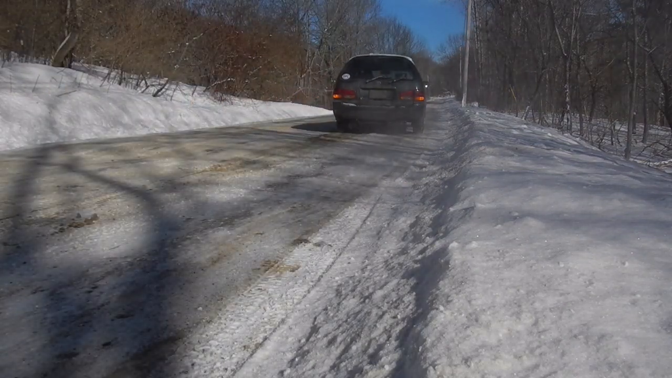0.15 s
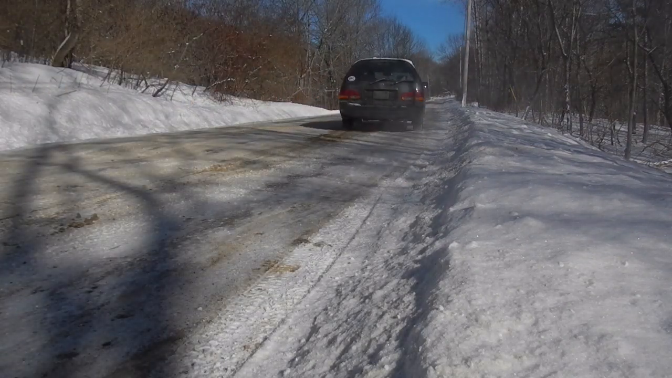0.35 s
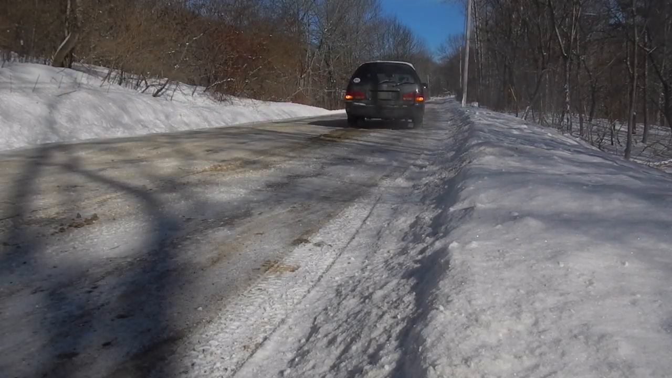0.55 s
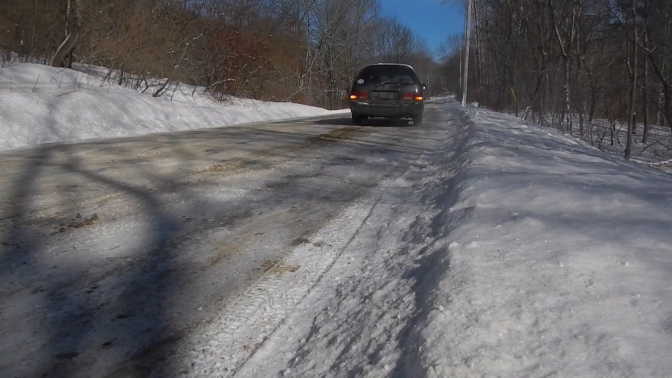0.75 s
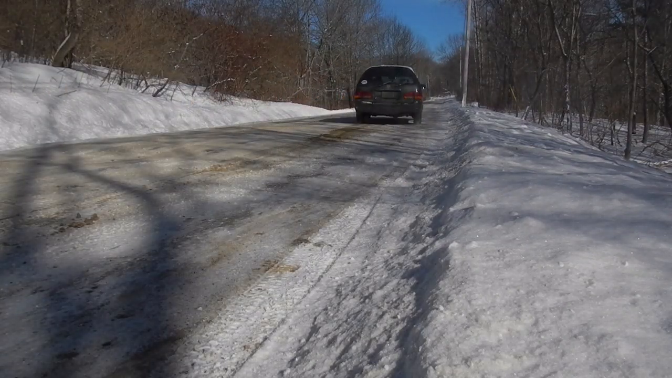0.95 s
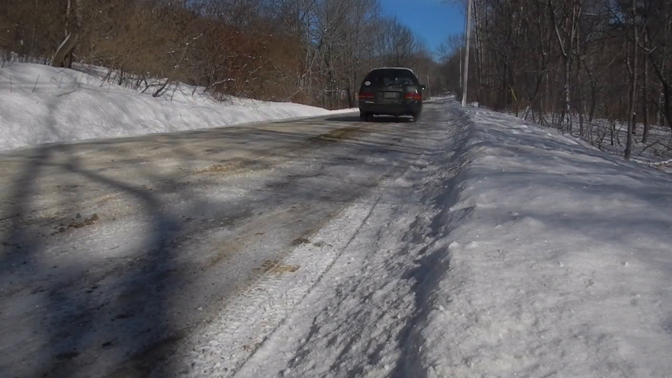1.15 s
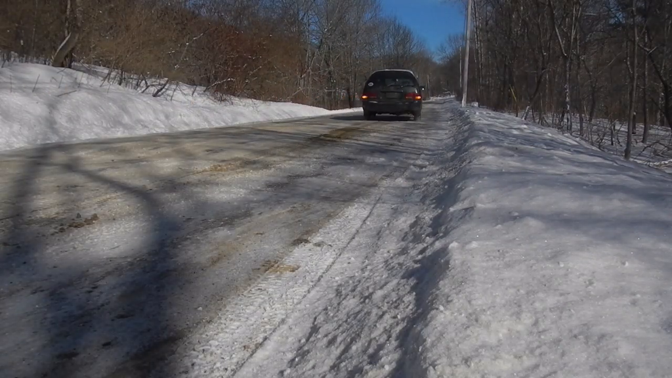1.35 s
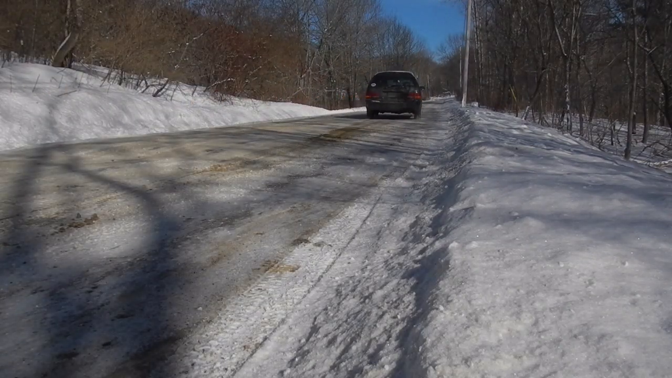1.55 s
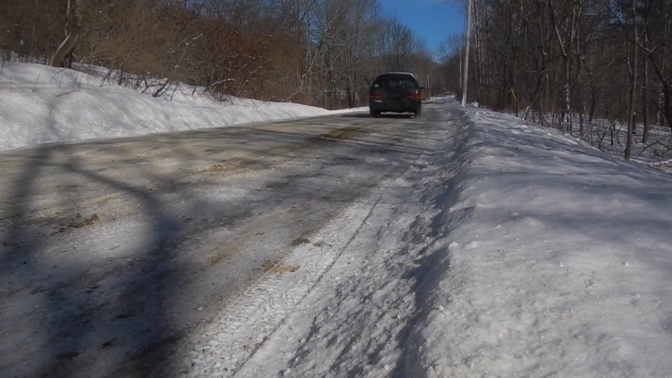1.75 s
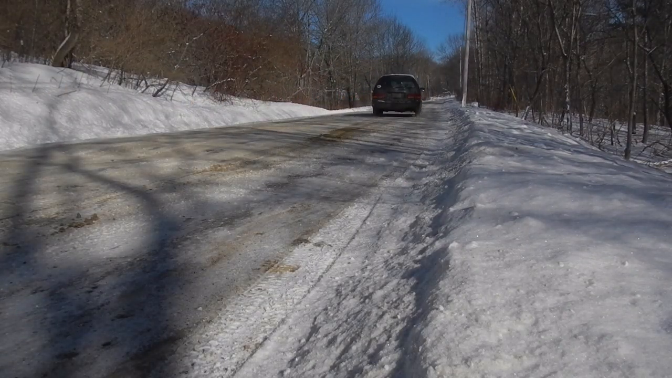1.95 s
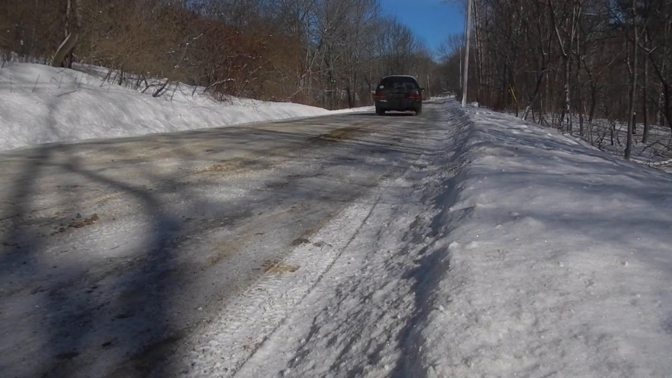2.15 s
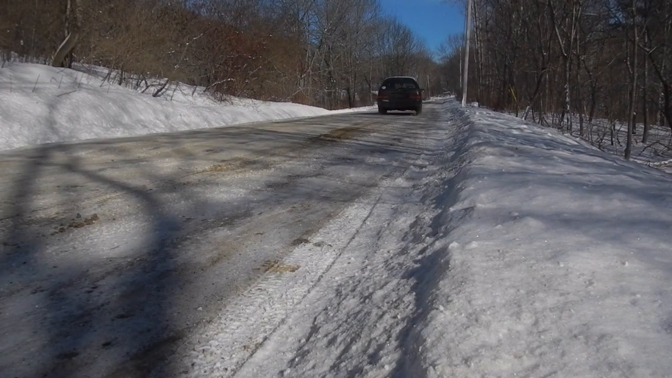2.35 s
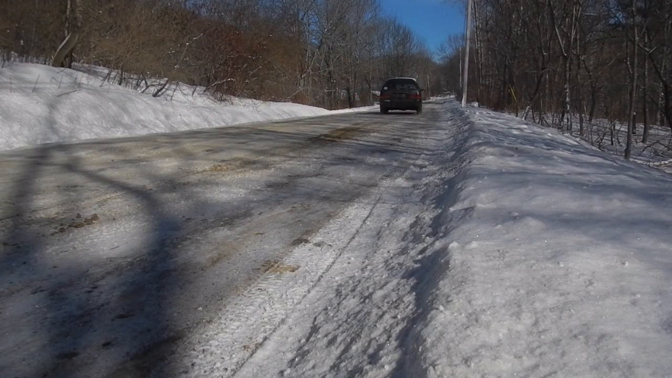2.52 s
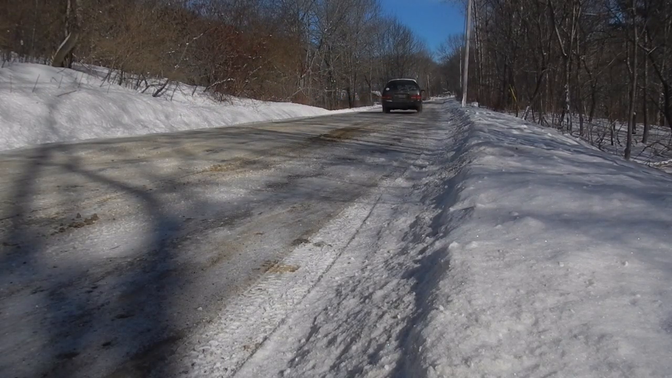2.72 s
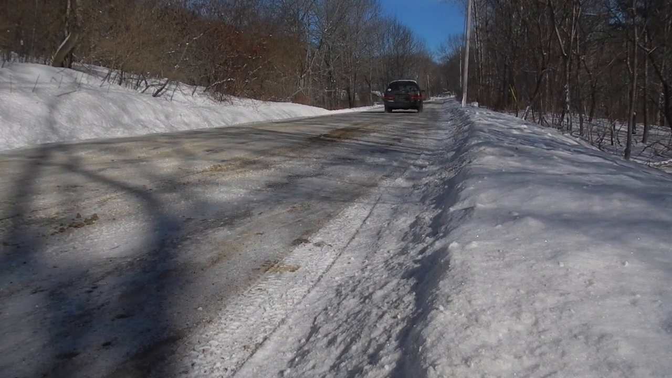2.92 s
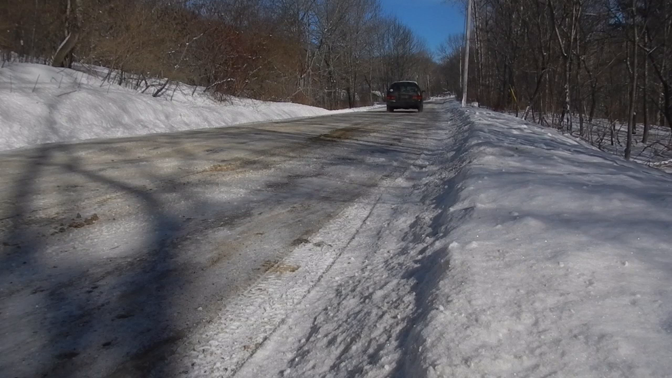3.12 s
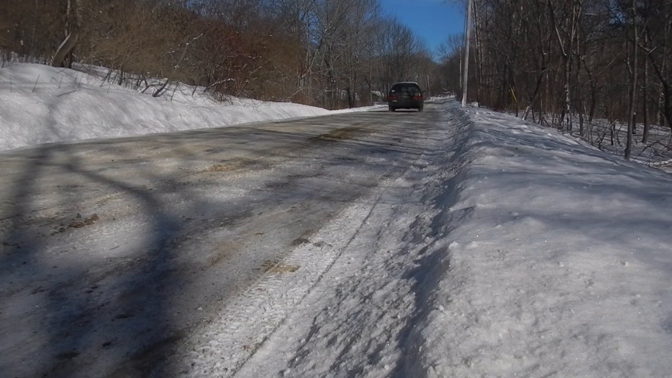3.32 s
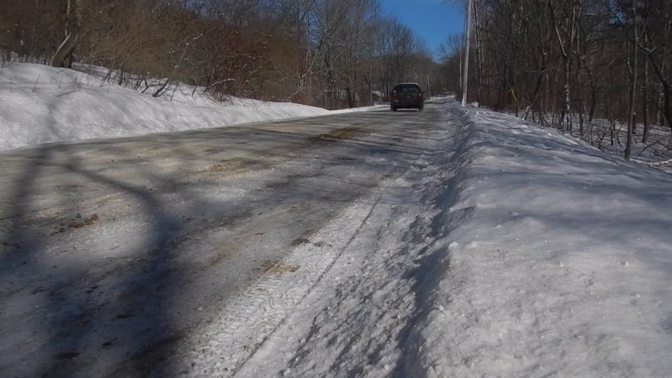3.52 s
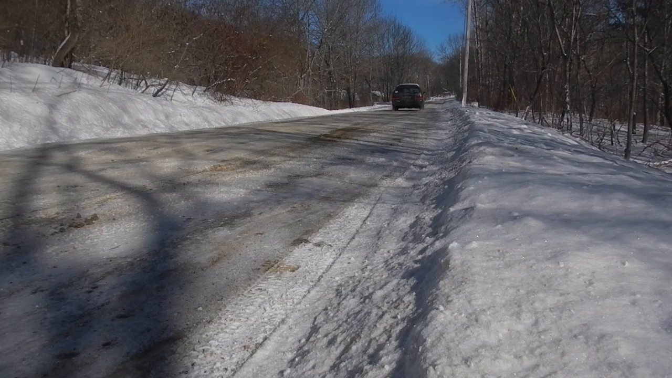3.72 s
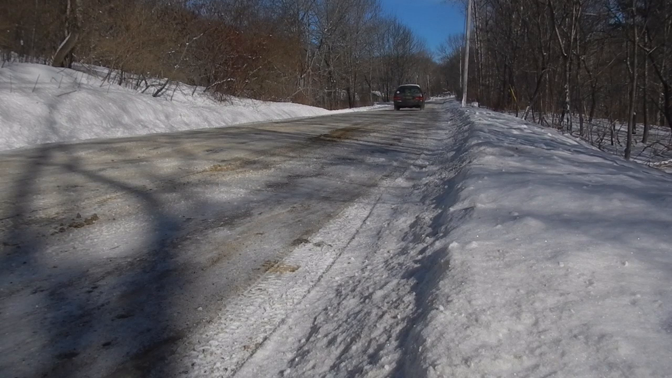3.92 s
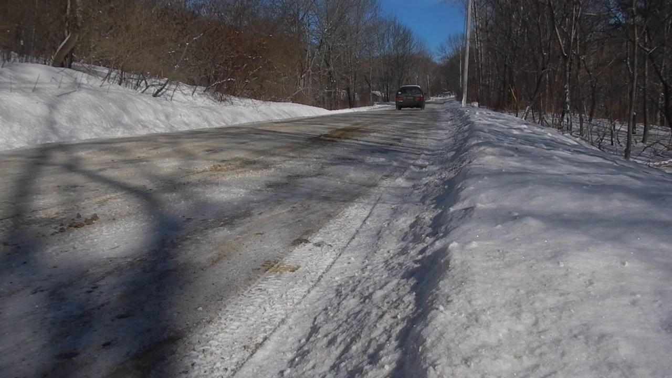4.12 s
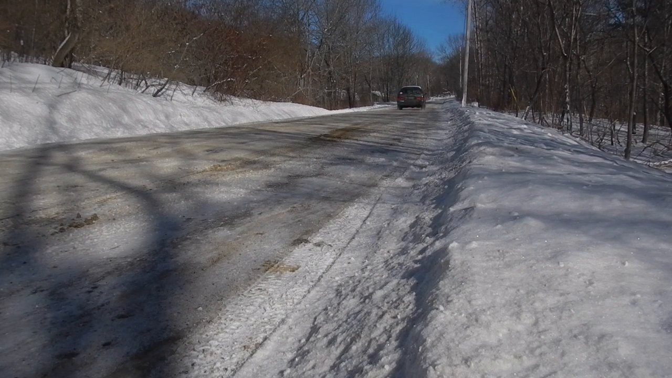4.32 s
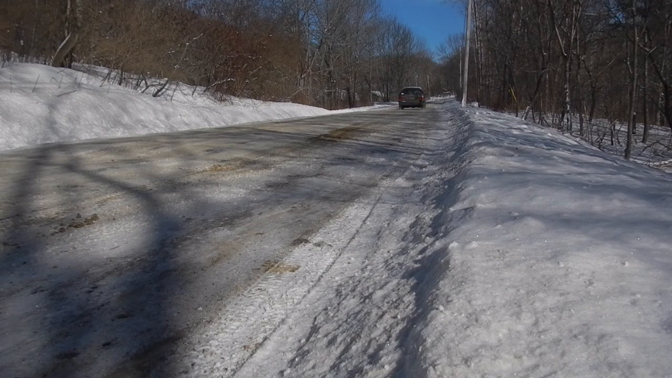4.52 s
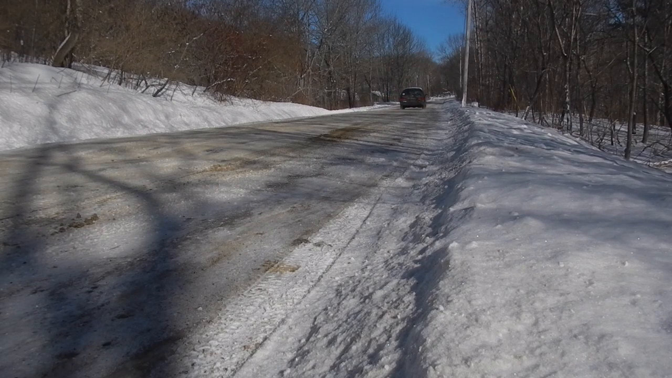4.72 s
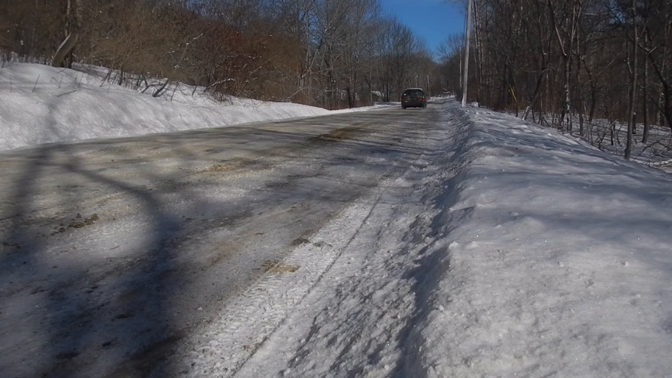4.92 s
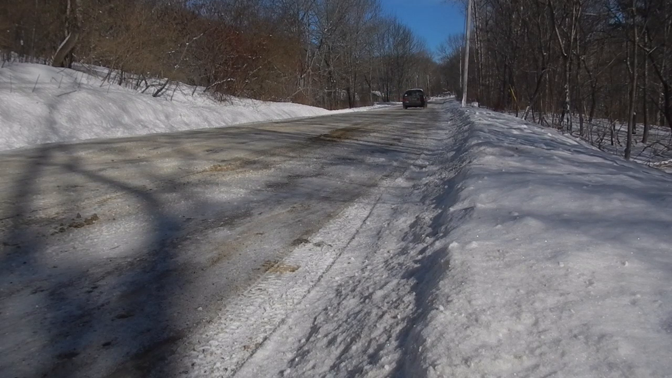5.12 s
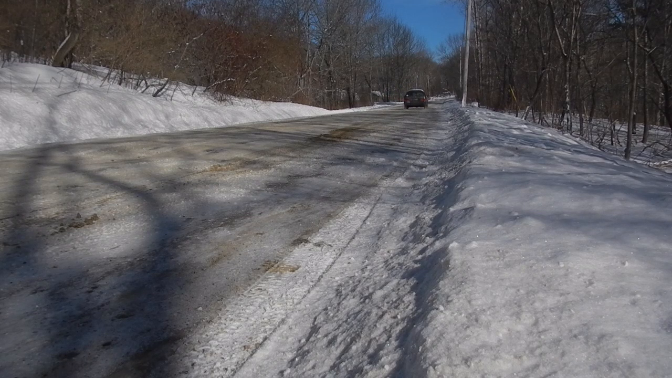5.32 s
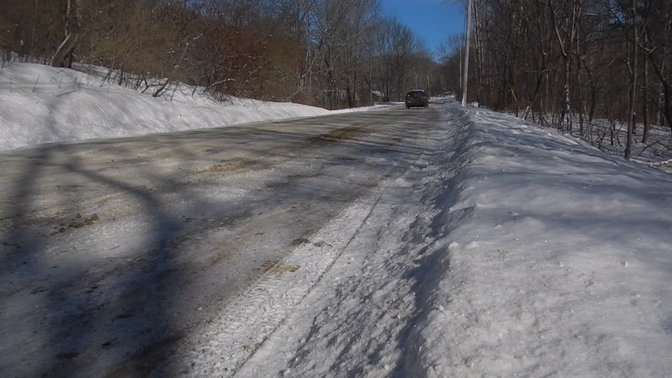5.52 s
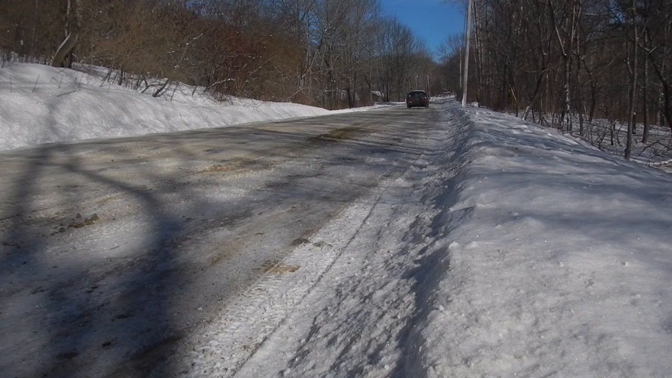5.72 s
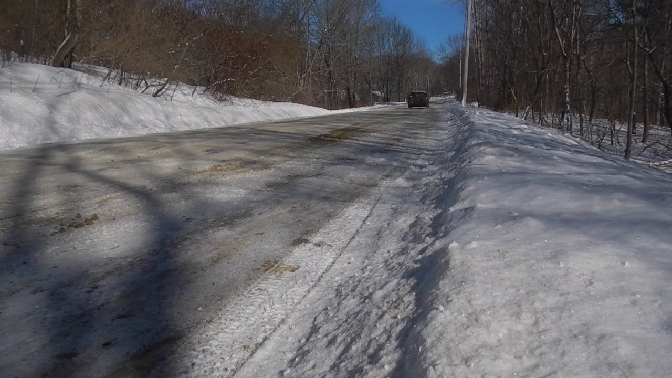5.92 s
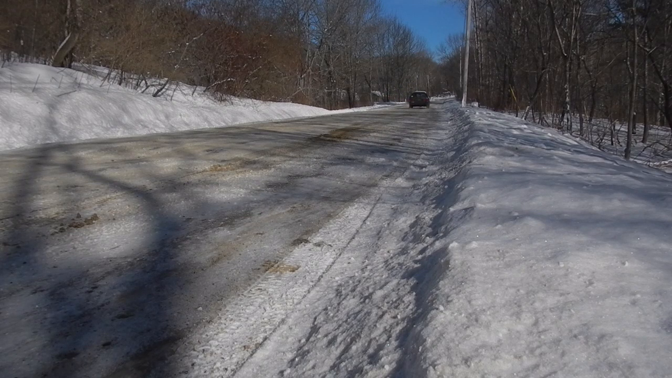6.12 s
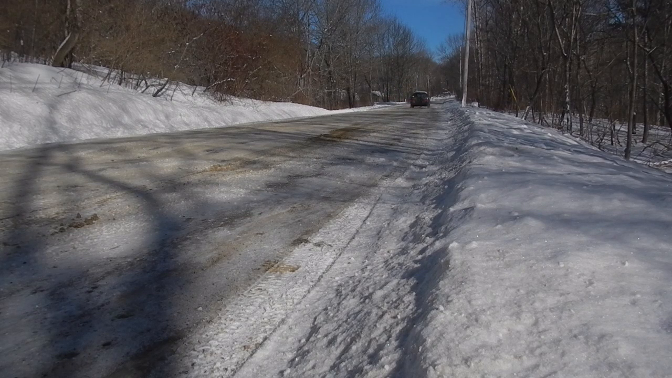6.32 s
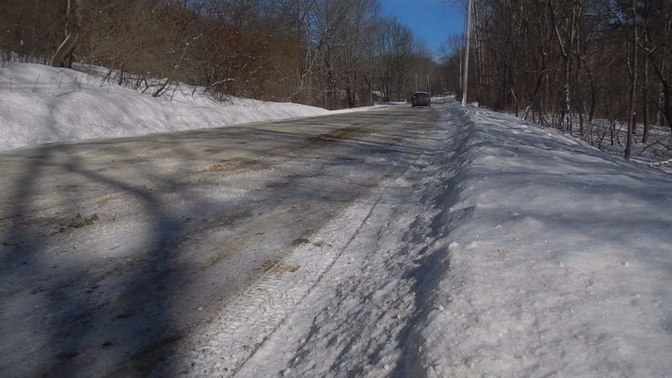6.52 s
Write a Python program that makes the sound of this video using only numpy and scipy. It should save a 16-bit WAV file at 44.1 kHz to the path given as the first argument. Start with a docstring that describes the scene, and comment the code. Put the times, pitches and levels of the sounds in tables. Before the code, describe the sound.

Outdoors on a snowy wooded road, a four-cylinder car is already close and pulling away at 0 s. Its open exhaust gives a deep, resonant drone, about 120 Hz and rising, with a rough, fluttering rasp. Slushy tyre hiss and tread roar surround it, surging around 0.4 and 0.9 s, with small dry grit snaps mostly in the first 0.7 s, then at 1.2 and 2.1 s. The engine climbs until about 1.5 s, eases and slides down through an upshift by 2 s, then climbs slowly again to the end near 6.7 s, steadily quieter and softer. Faint, thin, quavering bird notes around 7 kHz appear between 0.15 and 3.3 s. Tread roar lifts slightly near 4 s. A steady, slightly nasal outdoor hush remains, with stereo microphone hiss and a very faint high whine, mostly left.

```python
"""First heard, close by: the open exhaust of a four-cylinder car pulling away on a snowy road.
It shifts up once and fades into the distance; the pipe drones on crank orders and rasps with each firing.
Tyres hiss and crunch through slush and grit, as shaped noise with short snaps on top.
A small bird calls in thin, quavering tones from the woods, over a steady outdoor hush.
Two microphone ports hear it in stereo; the camera adds its own hiss and a faint high whine."""
import sys
import numpy as np
from scipy import signal
from scipy.fft import rfft, irfft, next_fast_len
from scipy.io import wavfile
from scipy.ndimage import uniform_filter1d, map_coordinates

SR = 44100
rng = np.random.default_rng(int(sys.argv[2]) if len(sys.argv) > 2 else 0)


def dump_mix(stems):
    """Bounce the given channels to the path in sys.argv[1] as a 16-bit WAV at rate SR."""
    frames = np.atleast_2d(stems).T  # one column per channel
    limited = np.clip(frames, -1, 1)  # hard clip at full scale
    pcm = np.round(limited * 32767).astype(np.int16)
    wavfile.write(sys.argv[1], SR, pcm)


N = 293706

# The engine climbs, drops at the upshift and climbs again: (time [s], crank speed [Hz])
CRANK_SPEED = [(0.0, 59.28), (0.15, 61.52), (0.4, 62.93), (0.95, 65.41), (1.5, 68.12), (1.62, 67.7),
               (1.8, 62.66), (1.97, 59.63), (2.3, 59.22), (2.65, 59.81), (3.05, 61.4), (3.5, 62.18),
               (3.75, 63.39), (3.97, 63.09), (4.3, 64.47), (5.3, 66.41), (5.65, 67.41), (6.66, 69.68)]
# Lines from unequal firings: (crank order, level against the mean of orders 1 and 3 [dB])
LOPE_LINES = [(.5, -28), (1.5, -11.5), (1.75, -10), (2.25, -17), (2.5, -22), (2.75, -17), (3.25, -19),
              (3.5, -24), (3.75, -19)]
# Overtones that follow the rasp: (crank order, relative level [dB])
BARK_LINES = [(4.5, -9.5), (4.75, 0.5), (5, 0.5), (6.25, -6), (6.5, -17), (6.75, 0), (7, -1), (8, -1),
              (10, -8.5)]
# Colour of the gas rushing from the pipe: (frequency [Hz], relative density [dB per Hz])
GAS_COLOUR = [(18, -33), (34, 3), (50, -4), (85, 5), (200, 2.5), (300, -12), (335, -17), (410, 0.5),
              (520, -7), (800, -8.2), (1300, -18), (2000, -25), (5000, -66)]
# The throttle eases for the upshift and opens in the new gear: (time [s], half width [s], rasp change [dB])
THROTTLE_MOVES = [(1.82, .22, -1.5), (3.3, 0.67, 1.3)]
# The rasp is stronger when the engine lugs, and softens with revs and with distance.
RASP_DB, LUG_HZ, RASP_DB_PER_HZ, RASP_DB_PER_M = -48, 60.03, 1.32, 0.32


def exhaust():
    """Clean crank orders, the lope of unequal firings, and a puff of gas at every firing."""
    crank_hz, = curves(CRANK_SPEED)
    order_db = order_levels(crank_hz)
    throttle_db = sum(db * swell(s, width_s) for s, width_s, db in THROTTLE_MOVES)
    rasp_db = RASP_DB + throttle_db - RASP_DB_PER_HZ * (crank_hz - LUG_HZ)
    rasp_db = rasp_db - fade(db_per_m=RASP_DB_PER_M)
    angle = 2 * np.pi * np.cumsum(crank_hz) / SR

    # firings leave the pipe alternately early and late, which puts the odd orders a quarter cycle off
    drone = sum(amp(db + 0.54 * wobble(30)) * np.sin(k * angle + k % 2 * np.pi / 2)
                for k, db in order_db.items())

    # the unevenness repeats every four turns of the crank, so its lines fall on quarter orders
    imbalance_db = (order_db[1] + order_db[3]) / 2
    lope = amp(imbalance_db) * sum(wavering_line(k, db, angle) for k, db in LOPE_LINES)
    bark = amp(rasp_db - 0.5) * sum(wavering_line(k, db, angle) for k, db in BARK_LINES)

    # the gas pulses twice a turn, with one of the two pulses stronger
    pulse_db = 4.4 * np.cos(2 * angle) + 2.9 * np.cos(angle)
    flutter_db = 4.2 * np.tanh(wobble(110))
    puffs = amp(pulse_db + flutter_db) * rng.standard_normal((2, N))
    gas = amp(rasp_db + 7.0) * spread(puffs, GAS_COLOUR)
    return np.sqrt(2) * (drone + lope + bark) + gas


def wavering_line(order, db, angle):
    """Combustion varies from cycle to cycle, so a weaker line wavers in size and timing."""
    phase = 0.22 * wobble(15) + rng.uniform(0, 2 * np.pi)
    return amp(db + 1.2 * wobble(5.9)) * np.sin(order * angle + phase)


# Each order swells as it sweeps through a pipe resonance; order 2 is the firing rate:
# (crank order, resonance [Hz], width [Hz], base level at resonance [dB], loss per doubling of distance [dB])
PIPE_RESONANCES = [(1, 51.5, 21.4, -32.5, 5.5), (2, 118.5, 14.1, -16.5, 7.5), (3, 193, 17.7, -24.5, 8),
                   (4, 222, 62, -37, 8), (6, 378.7, 17, -33.5, 7), (9, 573, 25, -56.5, 1)]
# While the car is close the pipe points past the microphone, dulling the orders above the firing rate.
OFF_AXIS_DB_PER_ORDER, OFF_AXIS_S = 1.3, 0.31
# Order 3 comes from uneven firing and weakens as the revs rise above the lugging speed.
UNEVEN_DB_PER_HZ = 0.52
# The pipe cancels a narrow band just under the resonance of order 3.
NOTCH_HZ, NOTCH_WIDTH_HZ, NOTCH_DB = 184.1, 3.3, 7
# The firings even out briefly as the new gear takes hold, which weakens order 3.
SHIFT_S, SHIFT_WIDTH_S, SHIFT_DIP_DB = 2.06, 0.1, 8


def order_levels(crank_hz):
    """Level in dB of each crank order, from its place on the pipe's resonance and the car's distance."""
    off_axis_db = OFF_AXIS_DB_PER_ORDER * swell(0, OFF_AXIS_S)
    levels = {}
    for k, hz, width_hz, db, loss_db in PIPE_RESONANCES:
        detuned_db = 10 * np.log10(1 + (2 * (k * crank_hz - hz) / width_hz) ** 2)
        levels[k] = db - detuned_db - max(k - 2, 0) * off_axis_db - fade(db_per_doubling=loss_db)
    uneven_db = UNEVEN_DB_PER_HZ * (crank_hz - LUG_HZ)
    notch_db = NOTCH_DB * np.exp(-((3 * crank_hz - NOTCH_HZ) / NOTCH_WIDTH_HZ) ** 2)
    levels[3] = levels[3] - uneven_db - notch_db - SHIFT_DIP_DB * swell(SHIFT_S, SHIFT_WIDTH_S)
    return levels


# Colours of tread roar, slush and fine spray: (frequency [Hz], relative density [dB per Hz])
ROAR_COLOUR = [(60, -24), (150, 0), (300, 4.5), (420, 0), (660, -2.5), (830, -0.5), (1100, -7.5),
               (1250, -6), (1700, -9), (2100, -11.5), (2600, -18.5), (6000, -46)]
SLUSH_COLOUR = [(900, -12), (1800, -4), (2500, 1.5), (3200, 1), (3800, -0.5), (4300, -6.5), (4900, -11),
                (5600, -22), (6700, -13.5), (9000, -27), (14000, -36)]
SPRAY_COLOUR = [(2000, -13), (4500, 3), (5800, -11), (6700, -0.5), (7300, -2), (8200, -3), (11000, -3),
                (13500, -4), (14500, -28)]
# Wet patches that the tyres run through: (time [s], half width [s], extra slush [dB])
WET_PATCHES = [(0.359, 0.15, 6), (.88, .08, 5)]
PUDDLE_ROAR_SHARE = .3  # part of that rise which the tread roar follows
# Base level of each tyre noise, and how fast it fades with distance.
ROAR_DB, ROAR_DB_PER_M = -46.5, 0.33
SLUSH_DB, SLUSH_DB_PER_DOUBLING, SLUSH_DB_PER_M = -52, 2.5, 0.45
SPRAY_DB, SPRAY_DB_PER_M = -61.5, 0.16
# The tread roar swells as the car pulls harder in the new gear.
PULL_S, PULL_WIDTH_S, PULL_DB = 3.9, 0.64, 2.5


def tyres():
    """Tread roar, wet slush full of small crunches, and fine spray, each as patchy coloured noise."""
    wet_db = sum(db * swell(s, width_s) for s, width_s, db in WET_PATCHES)
    pull_db = PULL_DB * swell(PULL_S, PULL_WIDTH_S)
    roar_db = ROAR_DB + PUDDLE_ROAR_SHARE * wet_db + pull_db - fade(db_per_m=ROAR_DB_PER_M)
    slush_db = SLUSH_DB + wet_db - fade(SLUSH_DB_PER_DOUBLING, SLUSH_DB_PER_M)
    spray_db = SPRAY_DB - fade(db_per_m=SPRAY_DB_PER_M)
    roar = amp(roar_db) * spread(patchy(depth_db=2.2), ROAR_COLOUR)
    # single crunches stand out less as the slush grows fainter
    nearness = amp(slush_db - slush_db.max())
    crunch = amp(3.8 * np.sqrt(nearness) * wobble(450))
    slush = amp(slush_db) * spread(patchy(depth_db=1.3) * crunch, SLUSH_COLOUR)
    spray = amp(spray_db) * spread(patchy(depth_db=2.7), SPRAY_COLOUR)
    return roar + slush + spray


# Grit snapping under the tyres: (time [s], level before gain and colour [dB])
GRIT_SNAPS = [(0.148, -47), (0.2044, -52), (0.3254, -47), (0.3694, -48), (0.4544, -48), (0.703, -47),
              (1.1714, -44.5), (2.084, -43.5)]
# Colour of a snap: (frequency [Hz], gain [dB])
SNAP_COLOUR = [(400, -22), (800, -5), (2000, 1), (3400, 4), (4600, -2.5), (7000, -10.5), (12000, -20)]
SNAP_GAIN_DB = 9


def grit():
    """Bits of ice and gravel snap under the tread: noise bursts with a sharp rise and a quick decay."""
    track = np.zeros((2, N))
    t = np.arange(SR // 20) / SR
    for s, db in GRIT_SNAPS:
        # falls 60 dB in 32 ms
        envelope = amp(db + SNAP_GAIN_DB - 60 * t / 0.032) * (1 - np.exp(-t / 0.00054))
        shared = rng.standard_normal(len(t))
        separate = 0.55 * rng.standard_normal((2, len(t)))
        add(track, s, envelope * (shared + separate))
    return filtered(track, lambda hz: amp(along(SNAP_COLOUR, hz)))


# Bird calls from the woods: (time [s], peak level [dB])
BIRD_CALLS = [(.15, -62), (.215, -59), (.61, -62), (1.74, -62), (2.07, -65), (2.37, -68), (2.71, -62),
              (3.31, -70)]
CHIRP_S, CHIRP_HZ = 0.062, 7400


def bird():
    """Short thin notes: sine tones that rise a little and quaver, each at a slightly different pitch."""
    track = np.zeros(N)
    u = np.linspace(0, 1, int(CHIRP_S * SR))
    quaver = .012 * np.sin(2 * np.pi * 85 * CHIRP_S * u)  # 85 Hz
    pitch_hz = CHIRP_HZ * (1 + 0.027 * (u - .5) + quaver)
    for s, db in BIRD_CALLS:
        angle = 2 * np.pi * np.cumsum(pitch_hz * rng.normal(1, 0.0042)) / SR
        add(track, s, amp(db) * np.sin(np.pi * u) * np.sin(angle))
    return track


# Colours of the outdoor hush and the microphone hiss: (frequency [Hz], relative density [dB per Hz])
HUSH_COLOUR = [(50, -9), (150, 2.5), (310, -5), (400, 8), (520, 3), (700, -1), (1080, 0.5), (1220, -6.5),
               (1450, -5.5), (1680, 1.5), (1900, -6.5), (2100, -9), (2500, -15.5), (5000, -31)]
HISS_COLOUR = [(1000, -3), (3000, 6), (3700, 9.5), (4200, 1.5), (4800, 5), (5600, 3), (6700, 0),
               (8000, -0.5), (13500, -3.5), (14200, 5), (14500, -29)]


def background():
    """A steady outdoor hush with a nasal band, over the microphone's hiss, both as coloured noise."""
    hush = amp(-48) * spread(patchy(depth_db=1.5), HUSH_COLOUR)
    hiss = amp(-63.0) * spread(rng.standard_normal((2, N)), HISS_COLOUR)
    return hush + hiss


def amp(db):
    """Decibels to gain."""
    return 10 ** (np.asarray(db) / 20)


def unit(x):
    """Scale to rms 1."""
    return x / np.sqrt(np.mean(x ** 2) + 1e-20)


def along(points, hz):
    """Read (frequency [Hz], value) points on a log axis."""
    f, v = np.transpose(points)
    return np.interp(np.log(hz + 1), np.log(f + 1), v)


def curves(rows):
    """One value per sample for each column after the time."""
    s, *cols = np.transpose(rows)
    return [np.interp(np.arange(N) / SR, s, c) for c in cols]


def wobble(rate):
    """A smooth random curve with rate knots a second."""
    knots = rng.standard_normal(int(N * rate / SR) + 4)
    coarse = np.linspace(0, N, 8192)
    return np.interp(np.arange(N), coarse, map_coordinates(knots, [coarse * rate / SR]))


def swell(s, width_s):
    """A smooth bump of height 1 around time s."""
    return np.exp(-((np.arange(N) / SR - s) / width_s) ** 2)


# The car's distance at the start and its steady speed away.
START_M, SPEED_M_PER_S = 12.07, 6.77


def fade(db_per_doubling=0, db_per_m=0):
    """Decibels lost as the car drives away at a steady speed."""
    travelled_m = SPEED_M_PER_S * np.arange(N) / SR
    return db_per_doubling * np.log2(1 + travelled_m / START_M) + db_per_m * travelled_m


def filtered(x, response):
    """x times a response of frequency."""
    size = next_fast_len(N + SR // 4)
    return irfft(rfft(x, size) * response(np.fft.rfftfreq(size, 1 / SR)), size)[..., :N]


# Left-right likeness of the noise: (frequency [Hz], likeness [0-1])
LIKENESS = [(100, .95), (400, .85), (1000, .7), (1700, .85), (2600, .82), (3600, .76), (5000, .45),
            (9000, .08)]


def spread(pair, spectrum):
    """Two unrelated signals become one coloured stereo sound, its middle at rms 1."""
    def mid_side_gains(hz):
        turn = np.arccos(np.clip(along(LIKENESS, hz), -1, 1)) / 2
        return amp(along(spectrum, hz)) * [np.cos(turn), np.sin(turn)]

    mid, side = filtered(pair, mid_side_gains)
    return np.array([mid + side, mid - side]) / np.std(mid)


def patchy(depth_db):
    """Two noises whose level drifts in patches of time and frequency."""
    z = signal.stft(rng.standard_normal((2, N)), nperseg=512)[2]
    field = rng.standard_normal(z.shape[1:])
    field = uniform_filter1d(field, size=5, axis=0)  # across frequency
    field = uniform_filter1d(field, size=14, axis=1)  # across time
    return signal.istft(z * amp(depth_db * unit(field)), nperseg=512)[1][:, :N]


def add(track, s, sound):
    """Mix a sound into a track at time s."""
    start = max(0, round(s * SR))
    part = track[..., start:start + sound.shape[-1]]
    part += sound[..., :part.shape[-1]]


# Level between the microphone ports: (frequency [Hz], left minus right [dB])
PORT_LEVEL = [(60, -.5), (125, -.6), (200, -1.2), (380, -2.1), (700, -2), (1290, -5.8), (2380, -1.8),
              (4400, -.3), (12000, .1)]
# Phase between the microphone ports: (frequency [Hz], lead of the left port [rad])
PORT_LEAD = [(64, -.4), (125, -.3), (250, -.16), (600, -.05), (1300, .1), (1700, .7), (2200, 0)]


def scene():
    """The car ahead on the road, heard by two ports that differ a little in level and phase."""
    outdoors = exhaust() + tyres() + grit() + bird() + background()

    def ports(hz):
        halves = [.5, -.5]
        level = amp(np.outer(halves, along(PORT_LEVEL, hz)))
        return level * np.exp(1j * np.outer(halves, along(PORT_LEAD, hz)))

    return filtered(outdoors, ports)


WHINE_HZ, TOP_HZ = 14835.5, 15650


def record(dry):
    """The camera whines faintly, mostly on the left, and keeps nothing above its band limit."""
    side_gains = np.sqrt(2) * amp([[-60.5], [-72]])  # left, right
    tone = np.sin(2 * np.pi * WHINE_HZ * np.arange(N) / SR)
    whine = side_gains * amp(.35 * wobble(25)) * tone
    return filtered(dry + whine, lambda hz: hz < TOP_HZ)


dry = scene()
out = record(dry)
dump_mix(out)
```